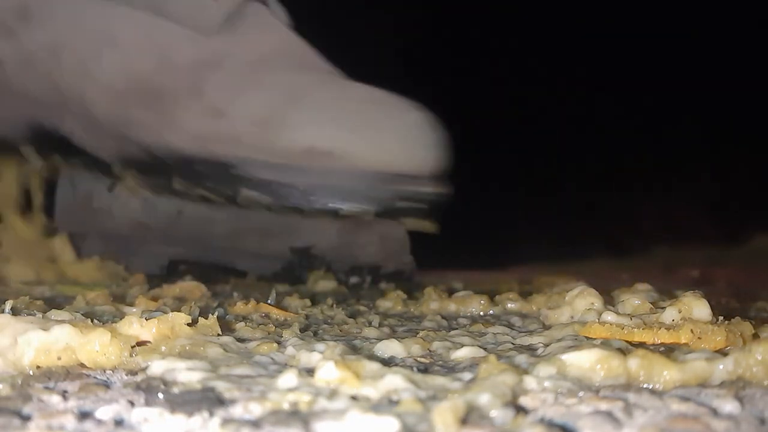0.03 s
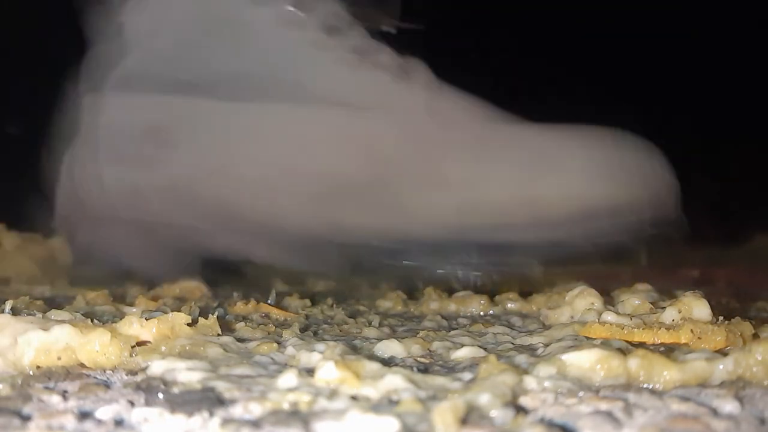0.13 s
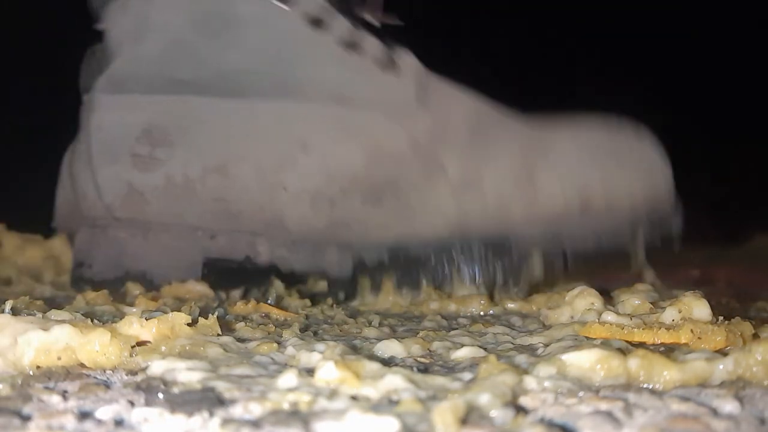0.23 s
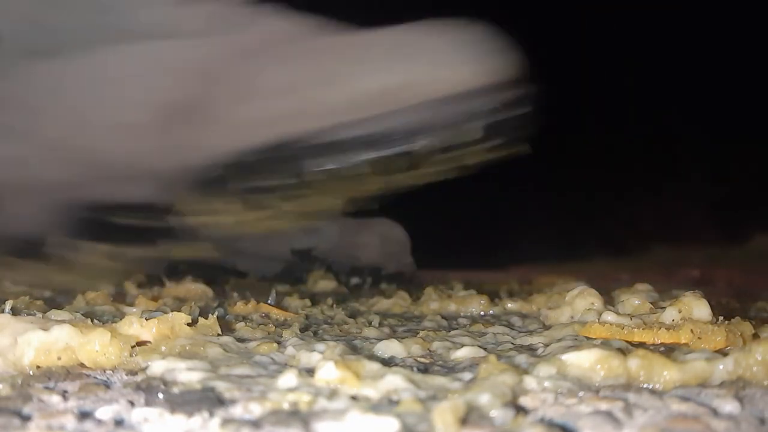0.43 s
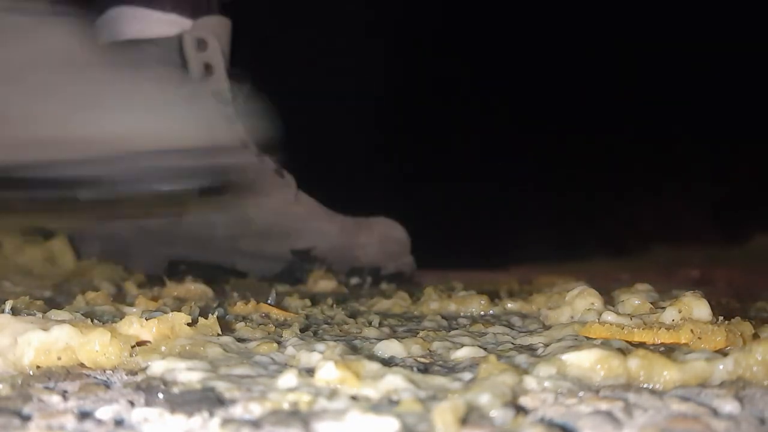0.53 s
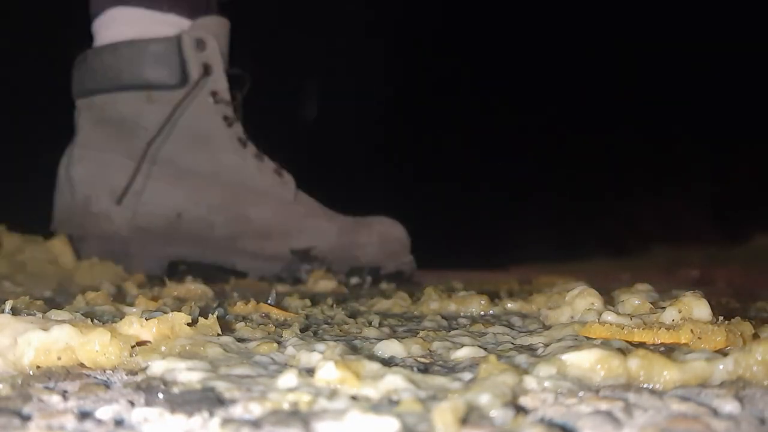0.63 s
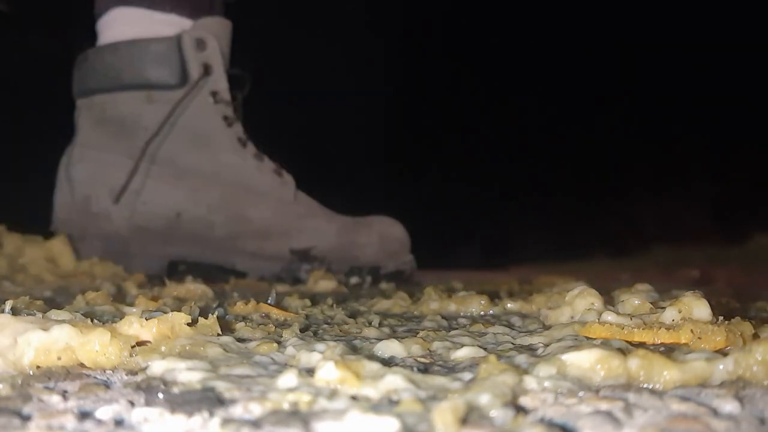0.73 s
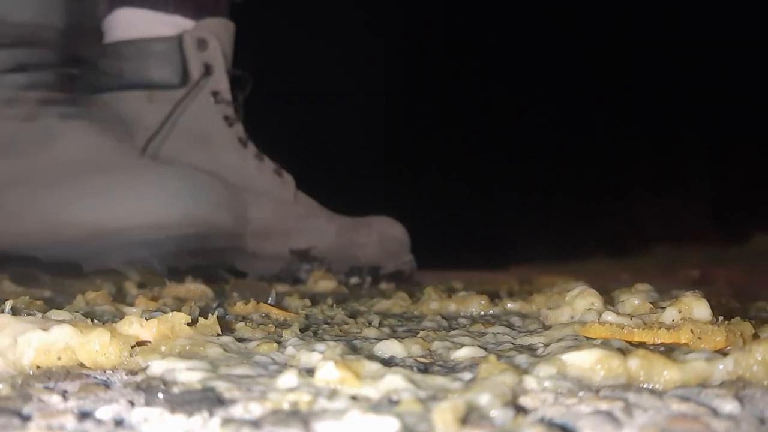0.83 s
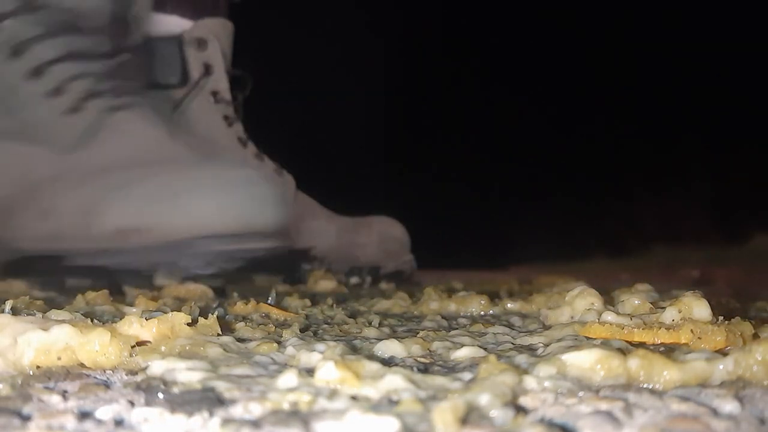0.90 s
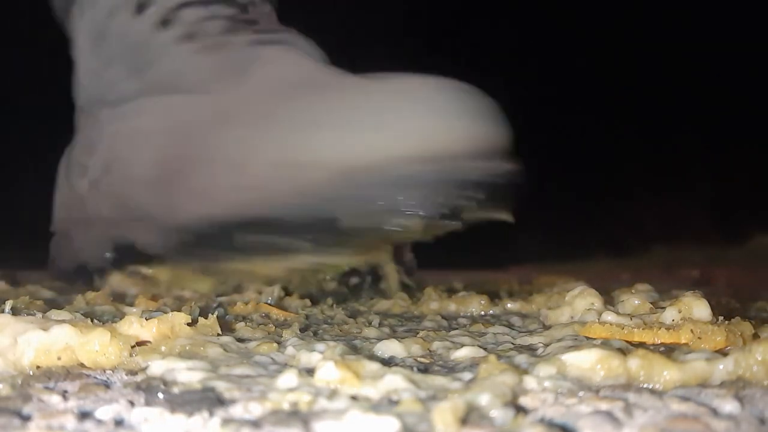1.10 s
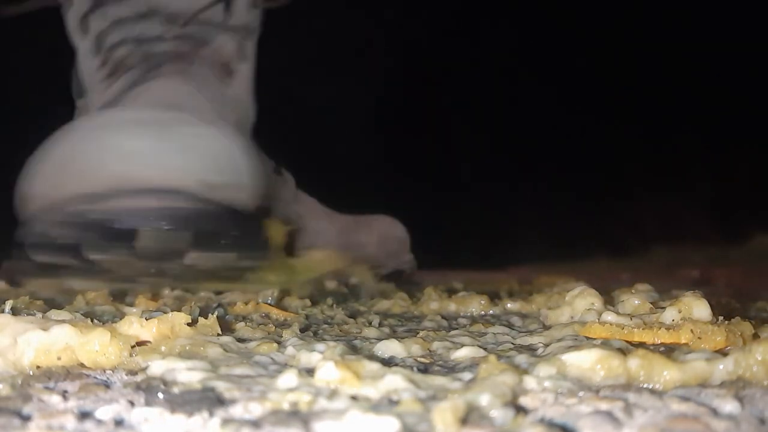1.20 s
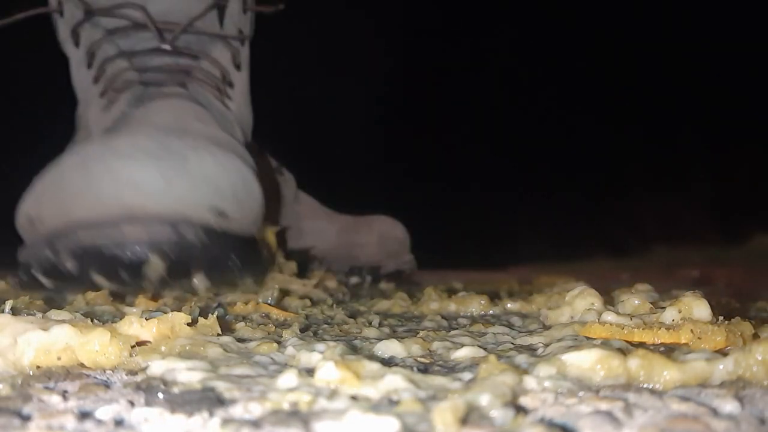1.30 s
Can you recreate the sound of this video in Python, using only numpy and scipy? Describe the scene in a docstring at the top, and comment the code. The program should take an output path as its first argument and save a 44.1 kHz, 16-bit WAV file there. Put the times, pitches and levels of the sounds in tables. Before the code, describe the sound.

A boot stamps twice on wet fruit pulp, with slaps, squelches and small pops.

```python
"""Boot stamping on crushed fruit

Stony ground outdoors, a phone lying low and close. A heavy boot stamps twice: the first slaps and
squirts; the second skids in, thuds and squeezes the pulp, then rolls over it. Juice hisses, wet pockets
pop and bits of pulp land, with a slight echo from the yard and a faint, distant rumble behind."""
import sys
import numpy as np
from scipy import signal
from scipy.fft import rfft, irfft
from scipy.io import wavfile

SR = 44100
rng = np.random.default_rng(int(sys.argv[2]) if len(sys.argv) > 2 else 0)


def transcribe(u):
    """Save the signal u as a 16-bit wav file named by the first command-line argument.

    u: samples, shape (n,) or (channels, n), limited to [-1, 1]; the rate is SR.
    q: integer samples, one column per channel.
    """
    v = np.clip(np.atleast_2d(u).T, -1, 1)
    q = np.round(v * 32767).astype(np.int16)
    wavfile.write(sys.argv[1], SR, q)


N = 59535
T = np.arange(N) / SR
LAG_MS = 0.11  # the boot's sound reaches the left microphone port this much later
PORT_DELAY_S = np.array([[LAG_MS / 1000], [0]])
SIDES = np.array([[1], [-1]])  # left, right


def amp(db):
    """Decibels to gain."""
    return 10 ** (np.asarray(db) / 20)


def unit(x):
    """Scale to rms 1."""
    return x / np.sqrt(np.mean(x ** 2))


def colour(x, points):
    """Filter by a curve of frequency_hz, gain_db points."""
    hz, db = np.array(points, float).T
    f = np.maximum(np.fft.rfftfreq(x.shape[-1], 1 / SR), 1)
    return irfft(rfft(x) * amp(np.interp(np.log(f), np.log(hz), db)), x.shape[-1])


def since(start_s, lag_ms=LAG_MS):
    """Seconds since an event reached the left and the right port."""
    return np.maximum(T - start_s - np.array([[lag_ms / 1000], [0]]), 0)


def swell(t, rise_ms):
    """Envelope of a soft blow: rises to 1 and is then smothered."""
    u = t / (rise_ms / 1000)
    return u * np.exp((1 - np.minimum(u * u, 120)) / 2)


def outdoors():
    """Distant rumble common to both ports, with wide hiss and a little wind on each port."""
    # frequency_hz, gain_db
    air = [(15, -28), (25, -1.5), (54, -8), (135, -9.5), (172, -5), (278, -11), (318, -8.5), (573, -9),
           (2370, -30.5), (3350, -31), (4040, -33), (7890, -33.5), (15000, -36.5)]
    mid = unit(colour(rng.standard_normal(N), air))
    side = unit(colour(rng.standard_normal(N), air))
    side = colour(side, [(300, -11), (2000, 0.9)])
    buffeting = [(8, -8), (25, -12), (60, 15), (150, -44), (1000, -73)]  # frequency_hz, gain_db
    wind = unit(colour(rng.standard_normal((2, N)), buffeting))
    return amp(-60) * (mid + side * SIDES) + amp(-71) * wind


def yard_echo(near, peak_ms=21, level_db=-29, low_cut_hz=600):
    """Faint, diffuse reflections from the yard, different at each port."""
    tail = rng.standard_normal((2, N // 4)) * swell(T[:N // 4], peak_ms)
    tail = tail / np.sqrt(np.sum(tail ** 2, axis=1, keepdims=True))
    highs = signal.sosfilt(signal.butter(2, low_cut_hz, "high", fs=SR, output="sos"), near)
    return amp(level_db) * signal.fftconvolve(highs, tail, axes=1)[:, :N]


def bubbles(low_hz, high_hz, count, samples, ring_cycles=1.63, pan_db=4.5):
    """A stream of tiny bursting bubbles, each with its own pitch, strength and direction."""
    when, pitch, strength, direction, pan = rng.random((count, 5)).T[:, :, None]
    hz = low_hz * (high_hz / low_hz) ** pitch
    gain = amp(-4 * np.log(1 - .97 * strength)) * hz / high_hz  # many weak, a few strong
    lag_s = (LAG_MS + 0.057 * (4 * direction - 2)) / 1000
    steps = np.arange(samples)
    index = ((when * N).astype(int) + steps).ravel()
    ports = []
    for side in (1, -1):
        cycles = np.maximum((steps - samples / 20) / SR - side * lag_s / 2, 0) * hz
        port_gain = gain * amp(side * pan_db * (pan - .5))
        rings = port_gain * np.exp(-cycles / ring_cycles) * np.sin(2 * np.pi * cycles)
        ports.append(np.bincount(index, rings.ravel(), N)[:N])
    return np.array(ports)


def pulp():
    """Pulp bubbles as the boot settles, skids and rolls: low squelch, crackling squish, fine fizz."""
    # time_s, squelch_db, squish_db, fizz_db (before each layer's cap and trim)
    settle = [(0.247, -41.5, -51, -61), (0.265, -92, -71, -72), (0.307, -93, -62.5, -61),
              (0.359, -85, -73, -67), (0.369, -96, -54.5, -49.5), (0.381, -91, -65.5, -75),
              (0.463, -88, -71.5, -66.5), (0.481, -94, -104, -80), (0.49, -83, -84, -64)]
    skid = [(0.835, -55, -90, -68), (0.849, -63, -74, -67), (0.863, -55.5, -42, -43),
            (0.897, -42.5, -46, -46.5), (0.907, -45, -44.5, -38), (0.915, -17, -37.5, -40.5),
            (0.925, -40, -36.5, -40), (0.957, -43, -42, -50.5), (1.017, -54, -44, -52),
            (1.025, -45.5, -46, -51.5), (1.065, -47.5, -47, -55), (1.091, -73, -55.5, -61.5),
            (1.107, -61, -51, -53.5), (1.145, -74, -72, -75)]
    roll = [(1.233, -53, -47, -60), (1.239, -88, -47, -48), (1.273, -55, -53.5, -55.5),
            (1.285, -71, -55, -50), (1.301, -54.5, -53.5, -60), (1.315, -71, -59, -56.5),
            (1.327, -59, -54.5, -56.5), (1.345, -56.5, -45.5, -56), (1.35, -64, -79, -58)]
    # tone of each layer: frequency_hz, gain_db
    squelch_tone = [(40, -18), (100, -1.5), (200, -0.5), (300, -0.5), (480, -2), (700, -12), (1100, -10),
                    (2500, -47)]
    squish_tone = [(400, -19), (900, -3), (1400, 0), (1900, 3), (2400, 2), (3100, 3), (4200, 0),
                   (5500, -17.5), (9000, -49)]
    fizz_tone = [(2500, -35), (4500, -1), (5800, -4), (8000, -4.5), (10500, -5.5), (12500, -8.5),
                 (15500, -15)]
    moves = [np.array(move) for move in (settle, skid, roll)]

    def envelope(column, trim_db, cap_db=0):
        """One layer's gain through the three moves, silent between them."""
        curves_db = [np.interp(T, m[:, 0], m[:, column], left=-np.inf, right=-np.inf) for m in moves]
        return sum(amp(np.minimum(db, cap_db) + trim_db) for db in curves_db)

    squelch = unit(colour(bubbles(105, 1090, count=2200, samples=900), squelch_tone))
    squish = unit(colour(bubbles(990, 6430, count=5000, samples=220), squish_tone))
    fizz = unit(colour(bubbles(4370, 16100, count=6500, samples=120), fizz_tone))
    return (squelch * envelope(1, trim_db=1.5, cap_db=-37)
            + squish * envelope(2, trim_db=0.5)
            + fizz * envelope(3, trim_db=1))


def pops(samples=2048, glide=0.144, tick_ms=0.28):
    """Wet pockets pop and pulp lands: a film breaks with a tick, the pocket rings and rises in pitch."""
    # start_s, pitch_hz, level_db, ring_cycles, tick_db (gain on the tick, on top of level_db)
    pockets = [(.0982, 525, -45, 1.4, -16), (0.0988, 1110, -57, 6.7, -28), (.1558, 7020, -51, 3, 11),
               (.2108, 810, -37.5, 3.6, -12), (.2182, 2100, -12, 1.24, 5), (.2825, 2950, -38, 2.6, 3),
               (.2838, 1200, -46.5, 4.6, -12), (.2875, 2740, -43, 1.6, -12), (.2928, 2200, -56, 2, -10),
               (.3000, 2070, -44, 1.4, 8), (.3020, 1370, -45.5, 7, -4), (.3174, 5900, -38.5, 1.1, 1.5),
               (.3304, 6550, -38.5, 3.6, -21), (.3358, 5000, -48, 0.92, -12), (.3428, 2810, -39.5, 2.9, 7),
               (.3440, 8900, -32, 1.5, -8), (.3643, 10400, -40, 2.5, -14), (.3690, 1670, -30, 1.4, -21),
               (.4229, 5300, -37, 2, -1.5), (.4310, 9800, -39.5, 2.1, -23), (.4424, 3800, -36.5, 1.5, -13),
               (.6450, 6600, -42, 1.8, -4), (.7124, 3370, -42.5, 6.9, -9), (.7744, 10200, -40, 1.3, -17),
               (.7883, 630, -38.5, 1.17, -21), (.7950, 10000, -45.5, 3.4, -15), (.8652, 4740, -41, 2.4, -2),
               (.8767, 2580, -46, 1.2, 21), (.9252, 2520, -32, 1, -4), (.9436, 583, -30, 2.9, -14),
               (.9860, 2850, -28, 1.4, -7), (1.0220, 7050, -32, 3.3, -13), (1.0388, 1620, -31.5, 2, 2),
               (1.1040, 533, -44.5, 1.8, -8), (1.1048, 1960, -39.5, 3.5, -4), (1.1182, 6000, -36, 2.5, -13),
               (1.1260, 2150, -43.5, 2.5, 13), (1.1969, 11700, -30, 1, -8), (1.233, 9000, -47, 0.78, 3),
               (1.2385, 4020, -30, 0.98, -20), (1.2857, 2520, -31.5, 1.7, -7),
               (1.3098, 1280, -42, 1.7, -37), (1.3187, 2640, -25.5, 1.6, -21),
               (1.3280, 2050, -26, 0.84, -18), (1.3408, 3570, -33.5, 1.3, 3.5)]
    out = np.zeros((2, N + samples))
    local_s = np.arange(samples) / SR
    t = np.maximum(local_s - PORT_DELAY_S, 0)
    for start_s, pitch_hz, level_db, ring_cycles, tick_db in pockets:
        fade = np.exp(-t * pitch_hz / ring_cycles)
        ring = fade * np.sin(2 * np.pi * pitch_hz * t * (1 + glide * (1 - fade) / 2))
        burst = 0.5 * rng.standard_normal(samples) * swell(local_s, tick_ms / 2)
        tick = np.interp(t, local_s, burst)  # as it arrives at each port
        i = int(start_s * SR)
        out[:, i:i + samples] += amp(level_db) * (ring + amp(tick_db) * tick)
    return out[:, :N]


def juice_sprays(scattered_share=0.96):
    """Juice shoots out in short hisses, mostly scattered by the stones and so unlike at the two ports."""
    # peak_s, rise_ms, decay_ms, level_db, centre_hz, width_octaves
    sprays = [(0.212, 0.2, 1.1, -40.5, 5030, 2), (0.2178, 0.71, 3.4, -23.5, 4640, 0.75),
              (0.2185, 0.17, 0.39, -15.5, 8300, 0.48), (0.2205, 2.1, 3.5, -26.5, 2760, 1.4),
              (0.227, 1.7, 4.8, -34.5, 10000, 0.31), (0.2336, 0.37, 0.64, -25.5, 6300, 0.66),
              (0.2349, 0.95, 2.36, -24.5, 1780, 1.5), (0.453, 17, 7, -56.5, 3060, .45),
              (0.9275, 0.53, 0.95, -25.5, 3700, 0.58), (0.933, 2.4, 6.1, -35.5, 3330, 0.91),
              (1.0689, 0.64, 0.88, -34.5, 4320, 0.49), (1.1048, 0.78, 1.2, -40, 2840, 1.4),
              (1.2338, 0.64, 0.53, -40.5, 9100, 1.8), (1.278, 1, 1.1, -42, 10000, 0.94)]
    f = np.maximum(np.fft.rfftfreq(N, 1 / SR), 1)
    port_delay = np.exp(-2j * np.pi * f * PORT_DELAY_S)
    out = 0
    for peak_s, rise_ms, decay_ms, level_db, centre_hz, width_octaves in sprays:
        noise = rfft(rng.standard_normal((3, N)))
        direct = np.sqrt(1 - scattered_share) * noise[0] * port_delay
        scattered = np.sqrt(scattered_share) * noise[1:]
        band = np.exp(-(np.log2(f / centre_hz) / width_octaves) ** 2 / 2)
        hiss = unit(irfft((direct + scattered) * band, N))
        past_peak_ms = 1000 * (T - peak_s)
        envelope = np.exp(-np.maximum(-past_peak_ms / rise_ms, past_peak_ms / decay_ms))
        out += amp(level_db) * hiss * envelope
    return out


def air_squirts(closing_ms=0.36):
    """Air squeezed from under the sole chirps upward as the gap to the wet ground shuts."""
    # start_s, from_hz, to_hz, rise_ms, level_db
    squirts = [(.2180, 1300, 4550, .85, -12), (.9146, 3950, 4250, 1.1, -24)]
    out = 0
    for start_s, from_hz, to_hz, rise_ms, level_db in squirts:
        t = since(start_s, lag_ms=0.08)
        pitch_hz = to_hz + (from_hz - to_hz) * np.exp(-(1000 * t / closing_ms) ** 2 / 2)
        phase = 2 * np.pi * np.cumsum(pitch_hz * (t > 0), axis=1) / SR
        out += amp(level_db) * swell(t, rise_ms) * np.sin(phase)
    return out


def weight_shifts(left_over_right_db=15.5):
    """The ground takes the walker's weight in soft, heavily damped thuds, off to the left."""
    # start_s, pitch_hz, rise_ms, level_db (before panning)
    shifts = [(0.2309, 119.8, 3.46, -31.5), (0.9427, 223, 1.8, -35), (0.984, 67, 8, -41),
              (1.146, 59.3, 7.9, -49), (1.234, 77, 13, -43), (1.316, 58.3, 11, -47.5)]
    out = 0
    for start_s, pitch_hz, rise_ms, level_db in shifts:
        t = since(start_s)
        out += amp(level_db) * swell(t, rise_ms) * np.sin(2 * np.pi * pitch_hz * t)
    return out * amp(SIDES * left_over_right_db / 2)


def boot_stamps():
    """The sole strikes the ground, flat and then skidding; the pulp soon smothers its ringing."""
    # start_s, contact_ms
    stamps = [(.2175, 2.3), (.9134, 0.68)]
    # pitch_hz, ring_ms, flat_stamp_db, skidding_stamp_db
    sole_modes = [(92.8, 11.8, -30, -65), (159.3, 5.6, -17, -38), (204, 9.3, -81, -21.5),
                  (354, 13.5, -39.5, -26), (472, 4.12, -10, -21), (762, 6.2, -23, -33.5),
                  (1057, 3.4, -16, -30.5), (1444, 1.53, -7.5, -24.5)]
    out = 0
    for stamp, (start_s, contact_ms) in enumerate(stamps):
        t = since(start_s)
        attack = 1 - np.exp(-1000 * t / contact_ms)
        for pitch_hz, ring_ms, *levels_db in sole_modes:
            decay = np.exp(-(1000 * t / ring_ms) ** 2 / 2)
            out -= amp(levels_db[stamp]) * attack * decay * np.sin(2 * np.pi * pitch_hz * t)
    return out


def scene():
    """Boot, juice and pulp close to the microphone; the yard and the open air behind."""
    near = boot_stamps() + weight_shifts() + air_squirts() + pops() + juice_sprays() + pulp()
    return near + yard_echo(near) + outdoors()


def record(dry, top_hz=15800):
    """The phone's microphone softens the high treble, and the very top is cut off."""
    # frequency_hz, gain_db
    mic_response = [(1000, -1), (11000, 0.5), (13500, -5.5), (15000, -10), (16000, -13)]
    top_cut = signal.ellip(8, .2, 80, top_hz, fs=SR, output="sos")
    return signal.sosfilt(top_cut, colour(dry, mic_response))


dry = scene()
out = record(dry)
transcribe(out)
```